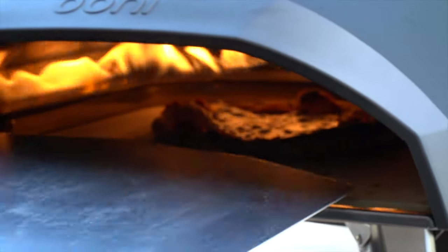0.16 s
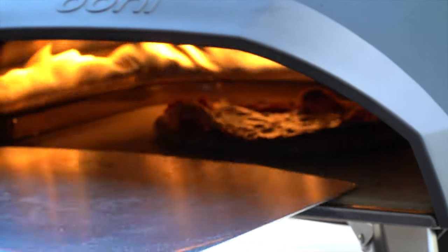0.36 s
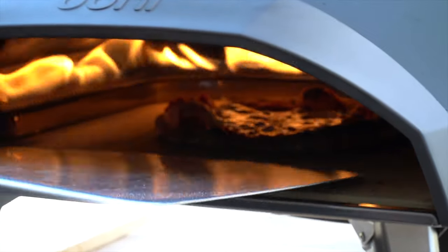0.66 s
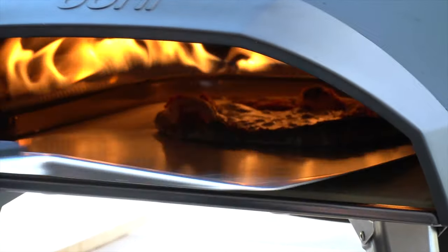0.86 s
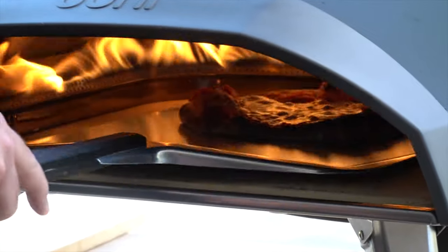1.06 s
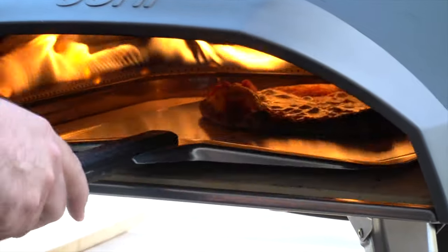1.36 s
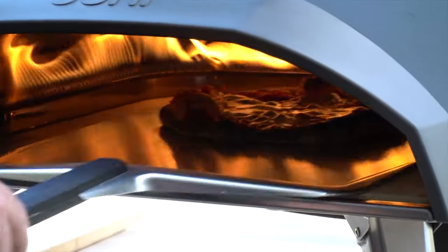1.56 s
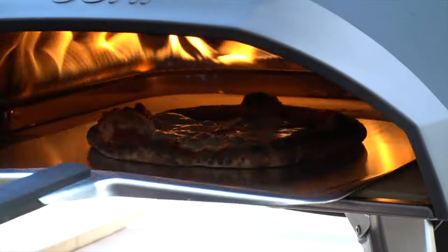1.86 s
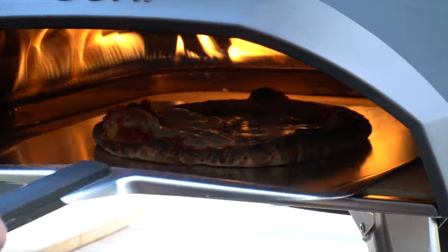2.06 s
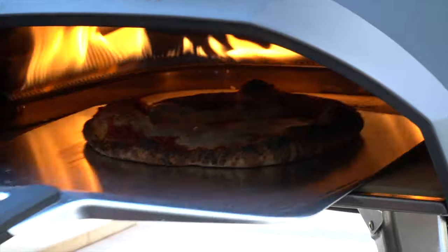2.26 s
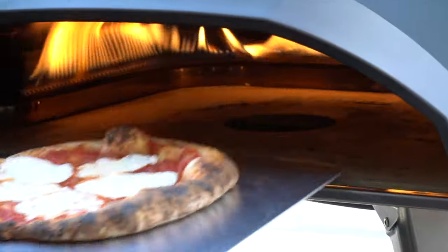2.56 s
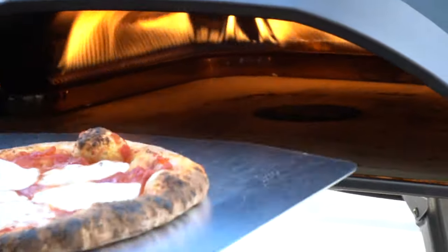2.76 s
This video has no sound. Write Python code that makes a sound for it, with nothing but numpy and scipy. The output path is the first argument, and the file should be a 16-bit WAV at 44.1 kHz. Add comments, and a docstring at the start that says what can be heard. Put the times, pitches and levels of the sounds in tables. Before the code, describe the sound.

A thin metal peel scrapes brightly onto gritty stone, clacks hard, bumps the hollow steel oven, shuffles in short scrapes, then clacks off the lip; outdoors, close mono microphone with low wind rumble.

```python
"""Metal peel at a stone oven

A thin metal peel slides over gritty stone, knocks the oven, is shuffled under the pizza and drawn out, its
edge clacking off the lip. Random clicks of grit ring the blade, decaying modes ring the oven, and short
bursts of noise make the taps. Shaped noise makes the wind on a mono microphone, its hiss and the soft burner."""
import sys
import numpy as np
from scipy import signal
from scipy.fft import rfft, irfft
from scipy.io import wavfile
from scipy.ndimage import uniform_filter1d

SR = 44100
rng = np.random.default_rng(int(sys.argv[2]) if len(sys.argv) > 2 else 0)


def store_pcm(level_fs):
    """Save levels as 16-bit WAV."""
    pcm = np.round(np.clip(level_fs, -1, 1) * 32767).astype(np.int16)
    wavfile.write(sys.argv[1], SR, np.atleast_2d(pcm).T)


N = 127890  # length [samples]

# Wind gusts before their flutter: (time [s], level [dB])
WIND_LEVEL = [(0.0, -33), (0.08, -35), (0.14, -45.5), (0.24, -17.5), (0.27, -36.5), (0.31, -38),
              (0.35, -15.5), (0.39, -23), (0.42, -22), (0.6, -22), (0.62, -29), (0.67, -34), (0.69, -20.5),
              (0.75, -37.5), (0.81, -27), (0.83, -20.5), (0.86, -34), (1.04, -31), (1.07, -43), (1.13, -34),
              (1.16, -43), (1.44, -30), (1.6, -31), (1.61, -37.5), (1.66, -22.5), (1.69, -36), (1.85, -41),
              (1.89, -28.5), (1.95, -41), (2.03, -30), (2.08, -39), (2.24, -40), (2.28, -33), (2.31, -43),
              (2.35, -29), (2.38, -35.5), (2.49, -40.5), (2.5, -32), (2.63, -50), (2.66, -37.5),
              (2.85, -43.5), (2.9, -52)]
# Tone of the wind rumble: (frequency [Hz], density [dB per Hz])
WIND_COLOUR = [(11, -19), (18, 7.5), (32, -4.5), (46, -2.5), (220, -34), (290, -58), (480, -120)]
WIND_FLUTTER_DB, WIND_FLUTTER_PER_S, WIND_EVEN_S = 3.5, 16, 0.035
# Tone of the burner and the microphone hiss: (frequency [Hz], density [dB per Hz])
BACKGROUND_COLOUR = [(88, -17), (150, -13), (209, -12.5), (339, -9), (404, -14), (510, -19.5), (585, -16.5),
                     (829, -28.5), (1260, -38), (1600, -43), (5570, -48.5), (8380, -47), (15600, -66)]
# Loudness of the burner before its waver, and of the microphone hiss:
# (time [s], low roar [dB], upper roar [dB], microphone hiss [dB])
BACKGROUND_LEVELS = [(0, -53, -60.5, -63.5), (.4, -53.5, -60, -64), (1.4, -51.5, -61, -64),
                     (1.7, -46.5, -53, -56), (2.1, -51.5, -53.5, -64), (2.5, -51.5, -69, -60),
                     (2.75, -46.5, -57, -61), (2.9, -50, -55.5, -59)]
BURNER_WAVER_DB, BURNER_WAVER_PER_S = 1.54, 6.39

# Sharp taps of the edge on stone: (time [s], peak [dB], brightness [Hz], time to fall 60 dB [s])
TAPS = [(0.137, -46, 4000, .02), (.334, -41.5, 9100, 0.03), (0.442, -40, 12000, 0.018),
        (0.635, -37, 2490, 0.02), (0.698, -43, 12000, .02), (1.962, -25, 12000, .02),
        (.893, -5, 9000, .005), (2.6395, -8, 4500, .025), (2.6445, -12, 7500, .018),
        (2.647, -9.5, 2370, 0.034), (2.666, -25, 4000, 0.075), (0.77, -38, 9000, .03),
        (1.4607, -45, 9000, .03), (2.4455, -20, 12000, .012), (2.521, -30, 16000, 0.016),
        (2.784, -48, 9000, .01)]
TAP_TAIL_DB, TAP_TAIL_TIMES, TAP_LOW_HZ = -16, 3.0, 700  # the tail lasts 3 times as long as the crack

# Scraping, one list a stroke: (time [s], edge hiss level [dB], blade body beside the hiss [dB],
# blade bass beside the hiss [dB], top treble beside the hiss [dB])
STROKES = [
    [(0.42, -76, -6, 12, -14), (0.426, -100, -5, 2, -13), (0.442, -44, -12, -22, -17),
     (0.468, -50, -2.5, -1.5, -14), (0.512, -34, -12.5, -19, -15), (0.53, -42.5, -3, -17, -14)],
    [(0.53, -41.5, -8, -15, -11), (0.592, -40.5, -8, -17, -13), (0.632, -71.5, 5, 13, -10),
     (0.664, -65, -8, -1, -10), (0.67, -58, -15, -13, -10)],
    [(0.67, -56, -15, -8, -6), (0.692, -54, -10, -4, -3.5), (0.7, -41.5, -12, -9, -4),
     (0.71, -47.5, -10, -14, -9), (0.746, -68, 2, 7, -13), (0.755, -60, -10, -19, -7)],
    [(0.755, -54, -9, -9, -7), (0.783, -34, -9, -13.5, -5), (0.843, -17, -12.5, -22.5, -9.5),
     (0.889, -20, -12, -6.5, -1.5), (0.9, -19, -5, -12.5, -14)],
    [(0.9, -22.5, -3, -9, -11), (0.91, -27, -1.5, -8.5, 2), (0.93, -24.5, -5, -8, -5),
     (0.968, -28.5, -2.5, -15, -5), (0.984, -40.5, -7, -6, -7), (1.0, -38.5, -4, -6, -11)],
    [(1.0, -42, 3, -1.5, -10), (1.016, -35, 3, -9.5, -12), (1.042, -40.5, 3.5, -8, -8),
     (1.072, -56, 4, 4.5, -7), (1.16, -71.5, 2, -5, -10)],
    [(1.16, -75, 0, -6, -6), (1.198, -50.5, 3, 1.5, -12), (1.235, -45, 4, 0.5, -11),
     (1.275, -46.5, 9.5, 4, -3), (1.292, -38, 1.5, 12, -8), (1.336, -62, 8, 23, -20), (1.36, -65, 3, 4, -1)],
    [(1.42, -67, -2, 10, -8), (1.472, -42, -2, -12, -6), (1.504, -48.5, -6, -5, -9),
     (1.524, -34.5, -4.5, -14.5, -11), (1.554, -43, 4.5, -4, -10), (1.565, -52, -9, -8, -12)],
    [(1.565, -36.5, -3, -17, -15), (1.589, -33.5, -7.5, -26, -7), (1.677, -29, -6.5, -26, -12),
     (1.713, -52, 3.5, -1, -12), (1.73, -45, -8, -9, -5)],
    [(1.73, -47, -16, -13, -3), (1.746, -43.5, -1, -14, -6), (1.772, -30.5, -8, -10, -8),
     (1.816, -35.5, -4, -25, -14), (1.844, -41.5, -3, -18, -4), (1.87, -59, 1, -7, -9)],
    [(1.87, -62, -2, -4, -9), (1.876, -42, -7, -18, -10.5), (1.886, -40, -6, -8.5, -6),
     (1.922, -35, -1.5, -9.5, -15), (1.958, -51.5, -2, -15, -12)],
    [(1.958, -48, -3, -20, -10), (1.964, -40, -15, -14.5, -14), (2.018, -36.5, 0, -9, -7),
     (2.036, -39, -7, -17, -11), (2.082, -46, 0, -18, -8), (2.15, -44.5, -0.5, -5.5, -4)],
    [(2.15, -52, -5, -11, 1), (2.19, -30.5, 0.5, -9, -11), (2.228, -38, -6.5, -19, -8),
     (2.268, -30, -0.5, -11, -15), (2.318, -30, -4.5, -15, -11), (2.37, -39, 2, -7, -12)],
    [(2.37, -39, -7, -12, -15), (2.4, -29.5, -0.5, -7.5, -5), (2.422, -43, 3, -3.5, -12),
     (2.442, -36, -4.5, -10, -5), (2.5, -41, 0, -10, 0.5), (2.515, -62, 1, 4.5, -16)],
    [(2.57, -67.5, 0, 5, -12), (2.6, -51.5, -3, -3, -5), (2.63, -54, 4, -10, -8)],
    [(2.658, -43, -2, 10, -21), (2.674, -45.5, 1, 13, -18), (2.7, -59.5, 6.5, -7, -3),
     (2.753, -71, 2, 12, -12), (2.76, -65, 8, 8, -20)],
]
# Tone of the edge hiss and top treble: (frequency [Hz], density [dB per Hz])
EDGE_COLOUR = [(2350, -30), (4000, -33), (4480, -3), (5260, -7.5), (7810, 3.5), (8810, 3.5), (12100, -14),
               (13800, -18), (15700, -23)]
# Tone of the blade's body and bass: (frequency [Hz], density [dB per Hz])
BODY_COLOUR = [(320, -40), (550, -8), (719, -11), (788, -11), (1210, 3.5), (1740, 0), (2220, -2),
               (2550, -7), (5000, -10.5), (6500, 3), (11000, -120)]
# Strongest resonances of the blade: (frequency [Hz], width [Hz], level before width and scatter [dB])
BLADE_MODES = [(1004, 53, 13), (1246, 120, 6), (1470, 35, 6), (1620, 130, 3), (2185, 48, -23),
               (3155, 66, -2)]
BLADE_DB, MODE_SCATTER_DB = -12.5, 4  # strong modes beside the rest of the blade; their random spread
SPLIT_HZ = 2017, 5080, 12760  # bass | body | edge | top
GRIT_PER_S, GRIT_SPREAD_DB = 14000, 1.9
CHATTER_DB, CHATTER_PER_S = 0.8, 200
CONTACT_PLACES, CONTACT_MOVES_PER_S = 9, 35
DENSE_RING_DB = -18  # ring of the blade's many dense modes beside the bare click
EDGE_T60_S, BODY_T60_S = 0.046, 0.043  # time to fall 60 dB

# Single blade modes that sing: (start [s], length [s], frequency [Hz], width [Hz], level before the fade [dB])
SINGS = [(.79, 0.18, 1250, 30, -32.5), (0.811, 0.16, 378, 21.8, -43), (1.186, 0.1, 910, 40, -52),
         (1.452, 0.028, 1360, 79.4, -40.5), (1.497, 0.047, 6100, 250, -36.5), (1.622, 0.23, 960, 44.6, -46),
         (2.249, 0.065, 1035, 40, -37.5), (2.7, .24, 1800, 56, -56), (2.718, 0.23, 1395, 80, -54.5),
         (2.797, .2, 886, 89, -54), (2.757, .14, 3500, 200, -62)]

# Blade bumps the oven: (time [s], level before halving [dB], contact [s], change of the low modes [dB])
KNOCKS = [(0.894, -28.5, 0.00058, -8), (1.286, -15, 0.00055, -8), (1.294, -14, 0.00099, -6.5),
          (1.309, -7, 0.0016, -1.5), (2.671, -28.5, 0.00048, 1)]
# Modes of the oven's steel shell: (frequency [Hz], level before changes [dB], time to fall 60 dB [s])
OVEN_MODES = [(163.5, -11.5, 0.4), (328.5, -2.5, 0.28), (358, 2.5, 0.35), (428, -11, 0.33),
              (484.6, -10, 0.6), (837, 1, 0.14), (1150, -5, 0.1)]
OVEN_SCATTER_DB = 2.0
THUD_GAIN, THUD_T60_S, THUD_LOW_HZ, THUD_HIGH_HZ = 3.557, 0.24, 267, 1680

TOP_HZ = 15800  # the microphone cuts above this


def undb(db):
    """Turn decibels into a plain multiplier."""
    return 10 ** (np.asarray(db) / 20)


def unit(x):
    """Scale a sound to an average (RMS) strength of 1."""
    return x / np.sqrt(np.mean(x ** 2))


def curve(table, col=1):
    """Draw straight lines over time through one column of a table."""
    table = np.array(table, float)
    return np.interp(np.arange(N) / SR, table[:, 0], table[:, col])


def colour(x, points):
    """Shape the tone by (Hz, dB) points, fading below the first and holding the last level above."""
    hz, db = np.array(points, float).T
    f = np.maximum(np.arange(len(x) // 2 + 1) * SR / len(x), 1)
    gain = undb(np.interp(np.log(f), np.log(hz), db))
    low_fade = np.minimum(f / hz[0], 1) ** 2
    return irfft(rfft(x) * gain * low_fade, len(x))


def band(x, lo_hz, hi_hz, order=4):
    """Keep only the part of a sound between two frequencies."""
    edges = [lo_hz, min(hi_hz, .45 * SR)]
    return signal.sosfilt(signal.butter(order, edges, "band", fs=SR, output="sos"), x)


def walk(rate):
    """Glide between random levels, `rate` of them a second, with an RMS of 1."""
    k = int(SR / rate)
    steps = np.repeat(rng.standard_normal(N // k + 1), k)
    return unit(uniform_filter1d(steps, k)[:N])


def ring(modes, length=.6):
    """Add up the fading tones that a blow sets off in a solid thing."""
    t = np.arange(int(length * SR)) / SR
    return sum(undb(db - 60 * t / t60) * np.sin(2 * np.pi * hz * t) for hz, db, t60 in modes)


def burst(t60, length=.3):
    """Stand in for many close modes of sheet metal with a fading noise."""
    t = np.arange(int(length * SR)) / SR
    return rng.standard_normal(len(t)) * undb(-60 * t / t60)


def add(out, x, s):
    """Mix a short sound into a longer one, starting at s seconds."""
    i = int(s * SR)
    out[i:i + len(x)] += x[:N - i]


def wind():
    """Gusts buffet the microphone: a rumble is evened out, then shaped into bumps."""
    rumble = colour(rng.standard_normal(N), WIND_COLOUR)
    power = rumble ** 2
    for _ in range(2):
        power = uniform_filter1d(power, int(WIND_EVEN_S * SR))
    gust_db = curve(WIND_LEVEL) + WIND_FLUTTER_DB * walk(WIND_FLUTTER_PER_S)
    gust_db = uniform_filter1d(gust_db, SR // 100)  # soften over 10 ms
    return rumble / np.sqrt(power) * undb(gust_db)


def burner_and_microphone_hiss():
    """Shaped noise makes a broad soft burner roar that wavers, and a microphone hiss that does not waver."""
    noise = colour(rng.standard_normal(N), BACKGROUND_COLOUR)
    low = unit(band(noise, 100, 900)) * undb(curve(BACKGROUND_LEVELS))
    upper = unit(band(noise, 900, 2400)) * undb(curve(BACKGROUND_LEVELS, col=2))
    microphone_hiss = unit(band(noise, 2400, SR)) * undb(curve(BACKGROUND_LEVELS, col=3))
    waver = undb(BURNER_WAVER_DB * walk(BURNER_WAVER_PER_S))
    return waver * (low + upper) + microphone_hiss


def taps():
    """The edge hits stone: a dry crack of noise with a longer, softer tail."""
    out = np.zeros(N)
    for s, peak_db, bright_hz, t60 in TAPS:
        tap = burst(t60) + undb(TAP_TAIL_DB) * burst(t60 * TAP_TAIL_TIMES)
        tap = band(tap, TAP_LOW_HZ, bright_hz, order=1)
        # a second gentle treble cut, up to an octave higher
        tap = signal.sosfilt(signal.butter(1, min(2 * bright_hz, .45 * SR), fs=SR, output="sos"), tap)
        add(out, tap / np.abs(tap).max() * undb(peak_db), s)
    return out


def grit_clicks():
    """Grains catch the edge at random moments with uneven strength, and their force chatters."""
    hits = (rng.random(N) < GRIT_PER_S / SR) * rng.standard_normal(N)
    extra_db = GRIT_SPREAD_DB * np.minimum(rng.exponential(size=N), 3.5)
    grit = hits * undb(extra_db)
    return unit(grit * undb(CHATTER_DB * walk(CHATTER_PER_S)))


def blade_ring():
    """Ring the strongest blade modes, with random levels for one place of contact."""
    modes = []
    for hz, width, db in BLADE_MODES:
        level = db + 10 * np.log10(width) + MODE_SCATTER_DB * rng.standard_normal()
        modes.append((hz, level, 2.6 / max(width, 15)))  # wide resonances die sooner
    return ring(modes, .3)


def scrape():
    """Grit clicks ring the blade, whose strong modes change as the contact moves between places."""
    rows = [row for stroke in STROKES for row in stroke]
    before = (rows[0][0] - .01, -100, 0, 0, 0)
    after = (rows[-1][0] + 0.0036, -100, 0, 0, 0)
    rows = [before] + rows + [after]
    grit = grit_clicks()

    # share the force among the places, keeping its total power
    places = np.array([walk(CONTACT_MOVES_PER_S) for _ in range(CONTACT_PLACES)]) ** 2
    places = places / np.sqrt(np.sum(places ** 2, axis=0))
    rings = [blade_ring() for _ in places]
    quiet = np.zeros(len(rings[0]))  # room ahead of each click for the tone shaping

    edges = [450, *SPLIT_HZ, SR]
    parts = [(BODY_COLOUR, BODY_T60_S, 3), (BODY_COLOUR, BODY_T60_S, 2),
             (EDGE_COLOUR, EDGE_T60_S, 0), (EDGE_COLOUR, EDGE_T60_S, 4)]  # bass, body, edge, top
    out = 0
    for k, (shape, t60, col) in enumerate(parts):
        lo_hz, hi_hz = edges[k], edges[k + 1]
        beside_db = curve(rows, col=col) if col else 0
        force = grit * undb(curve(rows) + beside_db)
        for place, strong in zip(places, rings):
            click = np.r_[quiet, 1, undb(DENSE_RING_DB) * burst(t60)[1:]]
            body = unit(band(colour(click, shape), lo_hz, hi_hz))
            if k < 2:  # strong modes only in the bass and body
                body = body + undb(BLADE_DB) * unit(band(np.r_[quiet, strong], lo_hz, hi_hz))
            body = body / np.sqrt(np.sum(body ** 2))
            heard = signal.oaconvolve(force * place, body)
            out = out + heard[len(quiet):len(quiet) + N]
    return out


def sings():
    """Rubbing or shaking drives one blade mode: noise through a narrow filter swells and fades."""
    out = np.zeros(N)
    for s, length, hz, width, db in SINGS:
        size = int(length * SR)
        peak = signal.iirpeak(hz, hz / width, fs=SR)
        tone = signal.lfilter(*peak, rng.standard_normal(N // 8))[-size:]
        add(out, unit(tone) * np.sqrt(np.hanning(size)) * undb(db), s)
    return out


def knocks():
    """Soft blows ring the modes of the oven's steel shell, with a dull thud of fading noise."""
    out = np.zeros(N)
    for s, db, contact_s, hollow_db in KNOCKS:
        push = np.hanning(int(contact_s * SR) + 3)  # a longer push sounds duller
        modes = []
        for hz, mode_db, t60 in OVEN_MODES:
            low_db = hollow_db * (hz < 2 * THUD_LOW_HZ)
            modes.append((hz, mode_db + low_db + OVEN_SCATTER_DB * rng.standard_normal(), t60))
        thud = THUD_GAIN * band(burst(THUD_T60_S, .6), THUD_LOW_HZ, THUD_HIGH_HZ)
        blow = np.convolve(ring(modes) + thud, push / push.sum())
        add(out, blow * undb(db) / 2, s)
    return out


def scene():
    """Mix all the sounds and put the same mix in both channels."""
    mix = wind() + burner_and_microphone_hiss() + taps() + scrape() + sings() + knocks()
    return np.tile(mix, (2, 1))


def record(dry):
    """The microphone rounds the loudest peaks and cuts the top."""
    rounded = .85 * np.tanh(dry / .85)
    return signal.sosfilt(signal.ellip(10, .2, 80, TOP_HZ, fs=SR, output="sos"), rounded)


dry = scene()
out = record(dry)
store_pcm(out)
```